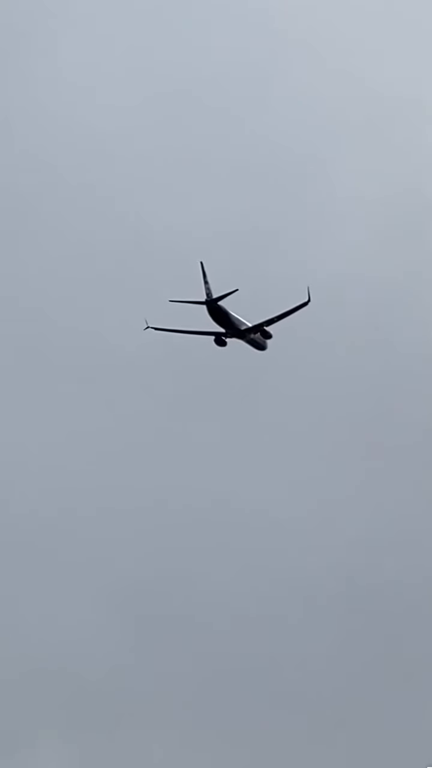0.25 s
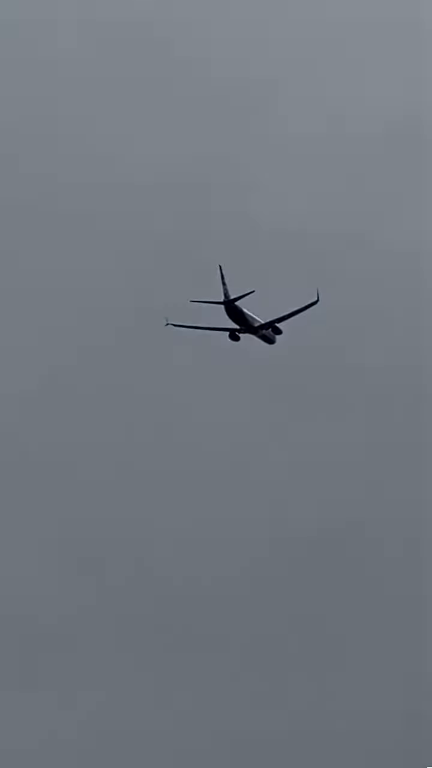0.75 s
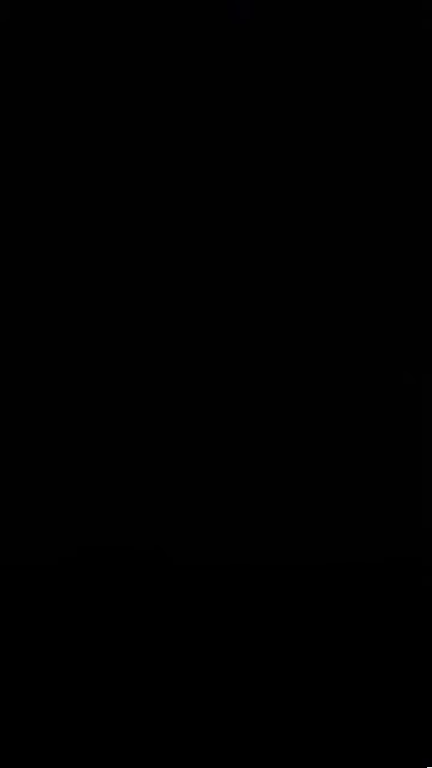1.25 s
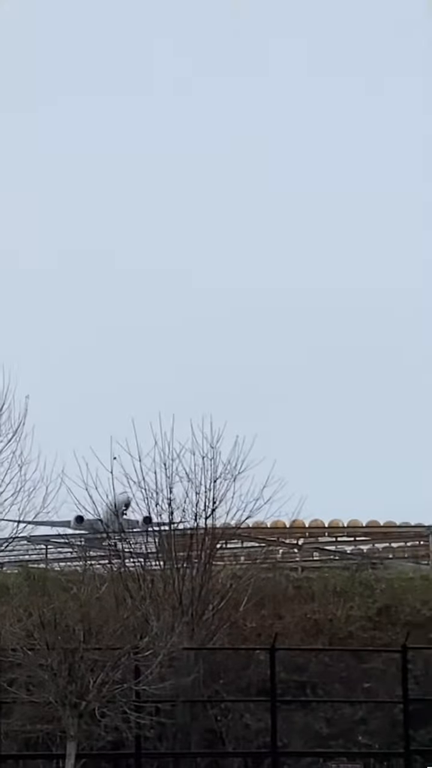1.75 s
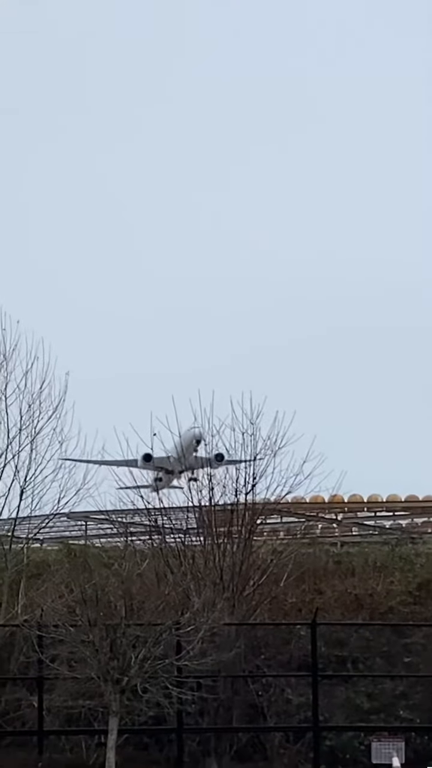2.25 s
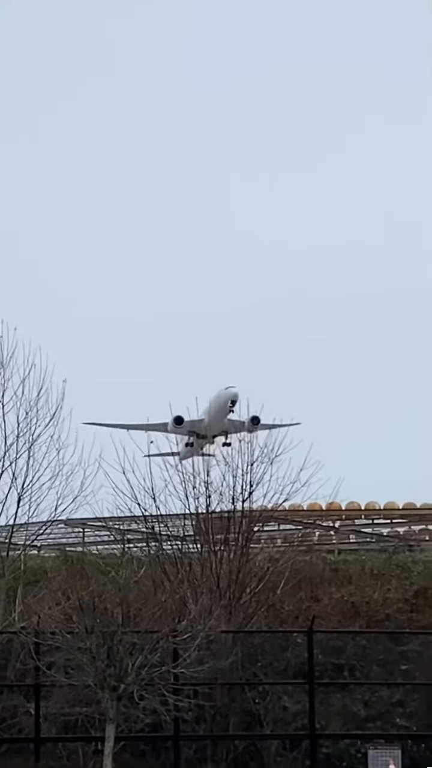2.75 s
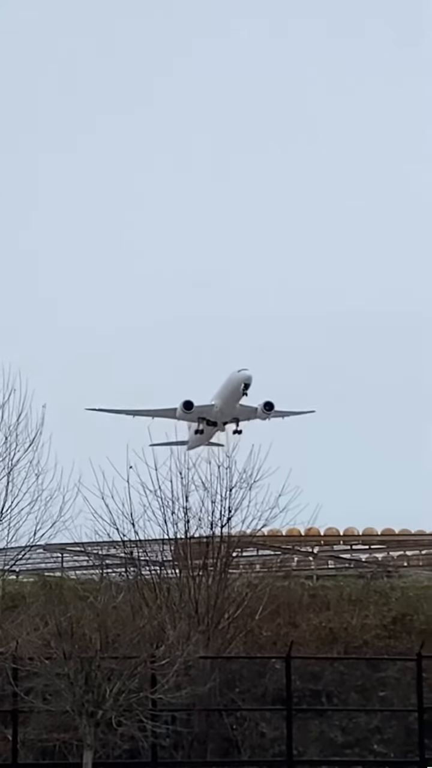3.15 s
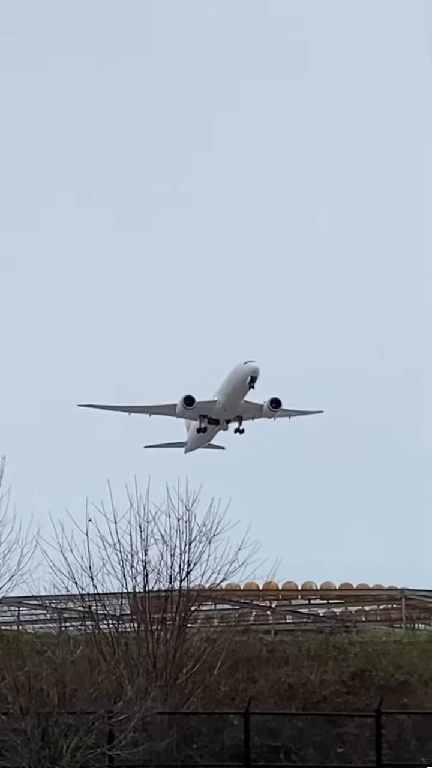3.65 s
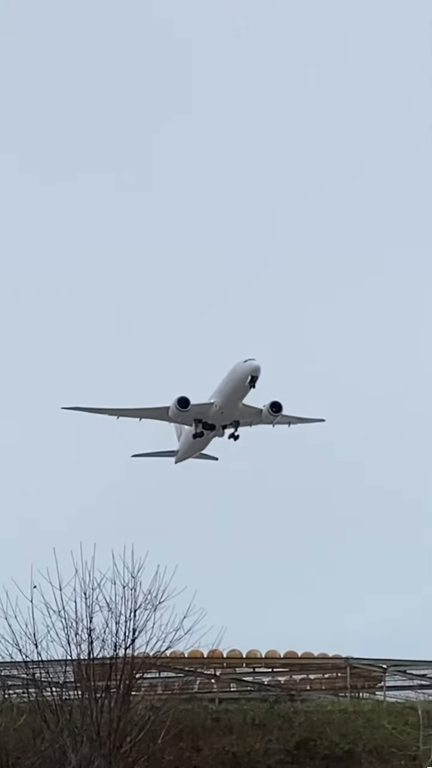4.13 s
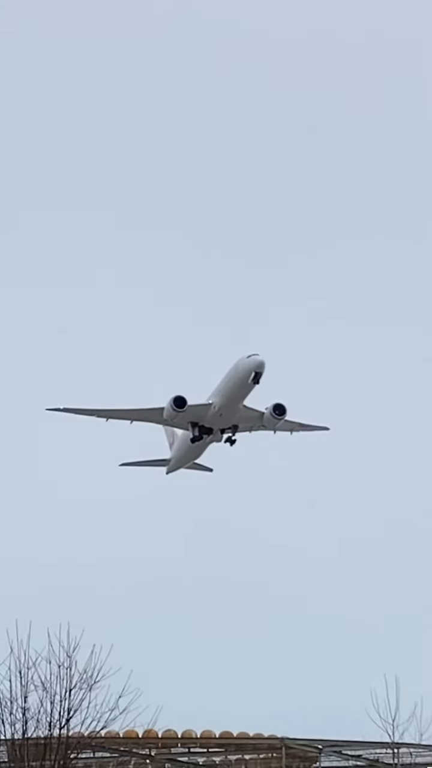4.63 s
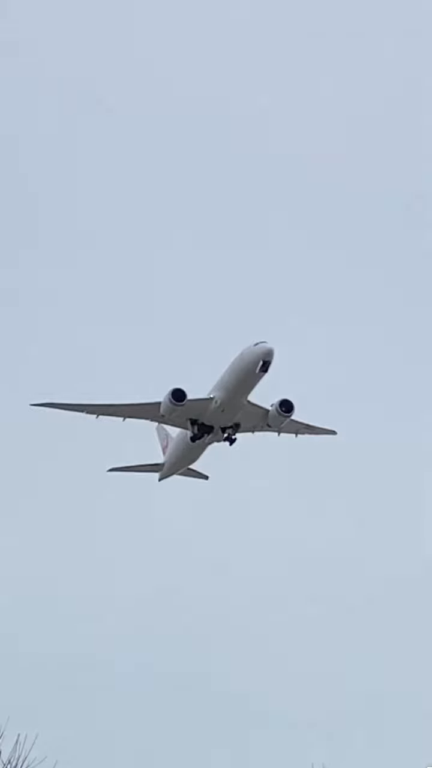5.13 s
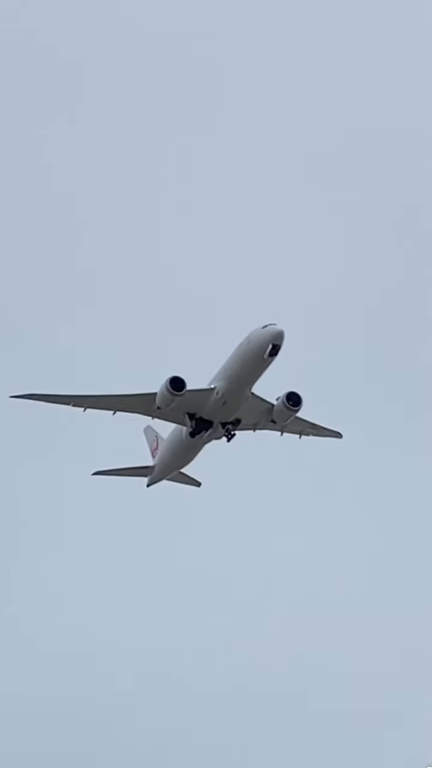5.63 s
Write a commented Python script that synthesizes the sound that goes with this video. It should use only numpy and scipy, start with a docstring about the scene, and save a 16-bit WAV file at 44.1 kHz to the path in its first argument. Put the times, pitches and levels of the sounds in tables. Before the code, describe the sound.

A receding jet's dark overhead roar cuts abruptly to a faint distant rumble that swells into a second airliner's bright, whining, tearing climb-out.

```python
"""Two twin-engined jet airliners climb out over an open spot by an airport, under a trace of very high hiss.
The first recedes overhead: dark exhaust roar, coloured noise combed by its ground echo.
At 1.226 s it gives way abruptly to the second, coming on from low behind a bank: noise registers go from
rumble to swelling fan rush, with clicks for crackle, gliding band noise for howl and sines for a wavering whine.
From 1 s small ticks and rustles (noise bursts) sound close by, and at 2.8 s a soft thump (a short cosine)."""
import sys
import numpy as np
from scipy import signal
from scipy.fft import rfft, irfft
from scipy.io import wavfile

SR = 44100
rng = np.random.default_rng(int(sys.argv[2]) if len(sys.argv) > 2 else 0)


def put_to_file(sound):
    """Save the sound as 16-bit audio at rate SR, in the file named by the first command-line argument."""
    columns = np.atleast_2d(sound).T  # one column per channel
    safe = np.clip(columns, -1, 1)
    whole_steps = np.round(safe * 32767)
    wavfile.write(sys.argv[1], SR, whole_steps.astype(np.int16))


N = 259308

TIME = np.arange(N) / SR   # s
HZ = np.maximum(np.arange(N // 2 + 1) * SR / N, 1)   # spectrum bins
SIDES = np.array([[1], [-1]])   # left, right
CHANGE_S = 1.226
CUTOFF_HZ = 15500
# approaching jet's treble: breaks through as it clears the bank, peaks as the inlets face the listener
# [t/s, swing/dB, followed in part by each register and the crackle]
TREBLE_SWING = [(1.26, -36.5), (1.7, -35), (2.47, -22), (2.9, -19.5), (3.15, -7.5), (3.4, -5), (3.55, 0.5),
                (3.72, 0.5), (4.2, 6), (4.6, -3), (5, 2), (5.55, -2.5), (5.88, -1.5)]


def from_db(db):
    """Decibels to gain."""
    return 10 ** (np.asarray(db) / 20)


def rms_one(x):
    """Scale to an rms of 1."""
    return x / np.sqrt(np.mean(x ** 2) + 1e-20)


def in_time(rows):
    """Each column of a time table, interpolated at every sample."""
    s, *columns = np.transpose(rows)
    return [np.interp(TIME, s, column) for column in columns]


def colour(points):
    """Gain at every bin from a [f/Hz, level/dB] table, interpolated over log frequency."""
    hz, db = np.transpose(points)
    return from_db(np.interp(np.log(HZ), np.log(hz), db))


def bump(at_s, spread_s):
    """Gaussian rise to 1 and fall, 1/e at spread_s from the centre."""
    return np.exp(-((TIME - at_s) / spread_s) ** 2)


def drift(corner_hz):
    """Slow random signal of spread 1: noise through a double one-pole low-pass."""
    step, settle = 40, 2000   # samples per slow sample; slow samples dropped
    pole = np.exp(-2 * np.pi * step * corner_hz / SR)
    noise = rng.standard_normal(N // step + settle + 2)
    slow = signal.lfilter([1], [1, -2 * pole, pole * pole], noise)[settle:]
    return np.interp(np.arange(N) / step, np.arange(len(slow)), rms_one(slow))


def stereo_noise(spectrum):
    """Coloured noise: a direct part common to both sides plus a scattered part of opposite sign."""
    # scattered part: widest early in the approach, narrowest near 4.4 s, then wider again
    # [t/s, level/dB added to width]
    diffuse = [(0, -8), (1.2, -7.5), (1.3, -4), (2.7, -4.5), (3.5, -7.5), (4.4, -18.5), (5.88, -9.5)]
    # spectrum of the scattered part [f/Hz, side minus mid/dB before the diffuse level]
    width = [(60, -37.5), (130, -37), (250, -23), (500, -9.5), (1000, -5), (2000, -9), (3500, -19),
             (6000, -10.5), (12000, -4)]
    low_cut = 1 / np.sqrt(1 + (18 / HZ) ** 4)
    mid, side = rfft(rng.standard_normal((2, N))) * colour(spectrum) * low_cut
    diffuse_db, = in_time(diffuse)
    direct = irfft(mid, N)
    scattered = from_db(diffuse_db) * irfft(side * colour(width), N)
    return direct + SIDES * scattered


def ground_echo(x, echo_rows, dull_hz):
    """A duller copy off the ground, whose changing lag sweeps a comb through the noise."""
    lag_ms, strength = in_time(echo_rows)
    bounced = irfft(rfft(x) / np.sqrt(1 + (HZ / dull_hz) ** 2), N)
    delayed = np.array([np.interp(TIME - lag_ms / 1000, TIME, side) for side in bounced])
    return x + strength * delayed


def through_air(x, splits_hz, levels_db, flutter_db, flutter_hz):
    """Each register follows its own level and flutters in the turbulent air."""
    rest, out = rfft(x), 0
    for split_hz, level_db, depth_db in zip([*splits_hz, SR], levels_db, flutter_db):
        below = 1 / (1 + (HZ / split_hz) ** 16)
        register = irfft(rest * below, N)
        rest = rest * (1 - below)
        gain = from_db(level_db + depth_db * drift(flutter_hz))
        out = out + rms_one(register) * gain
    return out


def receding_jet():
    """Exhaust mixing noise from high up, with a long ground echo; the rumble rolls by itself, the rasp swells most."""
    # engine noise heard from behind, balanced within each register only [f/Hz, level/dB per Hz]
    spectrum = [(22, -17), (35, -22), (55, 8), (100, 2.5), (220, -4), (420, -13.5), (620, -21.5),
                (1100, -28), (1600, -41), (2300, -45.5), (3500, -60), (5000, -78), (7000, -91),
                (15000, -101)]
    # ground echo [t/s, lag/ms, strength 0-1]
    echo = [(0, 4.8, .48), (.6, 4.74, .5), (.9, 4.66, .58), (1.08, 4.56, .74), (1.22, 4.53, .74)]
    # rumble [t/s, level/dB]
    rumble = [(0, -21), (.3, -21), (.45, -20), (.75, -20), (1.0, -19.5), (1.1, -19.5), (1.22, -22.5)]
    # upper roar sinks and swells again on its long way down [t/s, swell/dB, scaled per register]
    swell = [(0, 2.5), (.3, -1.5), (.7, -4), (.85, 0.5), (1.02, 1.5), (1.09, 7), (1.16, 4.5), (1.22, 2.5)]
    # exhaust roar, rush, rasp, hiss [level/dB at no swell, share of swell followed]
    registers = [(-21, 0.2), (-35, 0.3), (-47, 1), (-63.5, 0.6)]
    exhaust = ground_echo(stereo_noise(spectrum), echo, dull_hz=3200)
    rumble_db, = in_time(rumble)
    swell_db, = in_time(swell)
    levels_db = [rumble_db] + [db + share * swell_db for db, share in registers]
    return through_air(exhaust, [140, 540, 1400, 3000], levels_db,
                       flutter_db=[0.19, 0.18, 0.31, 0.38, 0.64], flutter_hz=11)


def thin_hiss(second):
    """A narrow noise band at a very high pitch, steady but for a drop as the second aircraft takes over."""
    centre_hz, half_width_hz = 11900, 330   # half gain at the half width
    first_db, second_db = -84.5, -96.5
    band = rfft(rng.standard_normal((2, N))) / (1 + ((HZ - centre_hz) / half_width_hz) ** 4)
    level = (1 - second) * from_db(first_db) + second * from_db(second_db)
    return level * rms_one(irfft(band, N))


def ticks(decay_s, width_octaves):
    """Each tick is a millisecond or so of noise through one broad resonance, with some of the bare snap."""
    # ticks close by [t/s, peak level/dB, ring f/Hz, bare snap/dB against the unscaled burst]
    tick_rows = [(0.9935, -27.5, 4370, -24), (1.199, -43, 4300, -19), (1.21, -58.5, 5370, -25.5),
                 (1.999, -59, 4630, -21), (2.035, -49.5, 12400, -11.5), (2.128, -57, 3910, -37),
                 (2.169, -63.5, 11500, -25), (2.277, -52, 3210, -36), (2.64, -56.5, 5280, -29.5),
                 (2.725, -64, 8930, -8), (3.168, -47.5, 5000, -33), (3.375, -48.5, 4300, -31.5)]
    out, size = np.zeros(N), 600
    for s, peak_db, ring_hz, snap_db in tick_rows:
        burst = rng.standard_normal(size) * np.exp(-np.arange(size) / SR / decay_s)
        edges_hz = ring_hz * 2 ** (np.array([-.5, .5]) * width_octaves)
        edges_hz = np.minimum(edges_hz, CUTOFF_HZ)
        resonance = signal.butter(2, edges_hz, "band", fs=SR, output="sos")
        tick = signal.sosfilt(resonance, burst) + from_db(snap_db) * burst
        at = round(s * SR)
        out[at:at + size] += from_db(peak_db) * tick / np.abs(tick).max()
    return out


def rustles(grain_db, grain_hz, sway_db, sway_hz):
    """Short spells of faint, grainy hiss that swell and die away unevenly."""
    # spells [loudest t/s, spread/s, level/dB]
    spells = [(1.207, .017, -71), (2.03, .06, -80.5), (2.62, 0.053, -73), (2.72, .055, -73)]
    # balance of the hiss [f/Hz, level/dB per Hz]
    spectrum = [(1500, -17.5), (3500, 6.5), (5500, -3), (7500, -7.5), (11000, -8), (15000, -17)]
    level = sum(from_db(db) * bump(s, spread_s) for s, spread_s, db in spells)
    uneven_db = grain_db * drift(grain_hz) + sway_db * drift(sway_hz)
    return level * rms_one(stereo_noise(spectrum) * from_db(uneven_db))


def approaching_jet():
    """Exhaust rumble and fan rush, with a short ground echo; rises out of the far roar and brightens as it nears."""
    # engine noise heard from ahead, balanced within each register only [f/Hz, level/dB per Hz]
    spectrum = [(22, -18.5), (35, -9.5), (55, 6.5), (150, 0), (300, -6), (520, -15.5), (800, -10.5),
                (1500, -20.5), (3000, -38), (4200, -46.5), (5200, -50.5), (7400, -62), (10500, -62),
                (15000, -71)]
    # ground echo [t/s, lag/ms, strength 0-1]
    echo = [(1.199, 1.1, 0.21), (2.4, 0.94, 0.026), (3.1, 0.87, 0.13), (3.901, .97, 0.17), (5, 0.8, 0.11),
            (5.601, 1.13, 0.14), (5.88, 1.2, 0.43)]
    # roar as the jet closes in [t/s, swing/dB against close, scaled per register]
    approach = [(1.26, -29), (1.75, -27), (2.2, -20.5), (2.65, -19), (3.2, -13.5), (3.6, -11), (4.2, -7),
                (4.45, -8), (4.68, -2.5), (4.88, -3.5), (5.03, -3), (5.4, -1), (5.55, -1.5), (5.8, 0)]
    # rumble, roar, upper roar, fan rush, upper rush, rasp, sizzle, hiss [close level/dB,
    # share of approach, share of treble, surge/dB, far airfield roar/dB]
    registers = [(-21.5, 0.68, 0.035, 0.5, -30), (-21, 0.95, -0.1, 2.5, -39.5),
                 (-28, 0.81, 0.011, 4.5, -66), (-24.5, 1.104, 0.063, 2, -52.5),
                 (-32, 1.15, 0.27, 1.5, -58.5), (-45.5, 0.48, 0.53, 9.5, -72.5),
                 (-57, 0.066, 0.83, 3.5, -86.5), (-61, 0.099, 1, -4, -95.5)]
    # brief heaves and lulls [t/s, rumble change/dB, roar change/dB, fan and upper rush change/dB]
    heaves = [(1.92, -2.5, 6, 0), (2.9, -2, 1, 1.5), (3.6, 2, 3.5, 0.5), (3.91, 5, 1.5, 3),
              (4.24, -0.5, 2, -1), (4.66, 2, 0, -0.5), (4.75, 2.5, 2, 0.5), (5.0, 1, -2, 2.5),
              (5.06, 2, -1, 2), (5.17, -2, 3.5, 0), (5.24, 3.5, 5, 0), (5.32, 3.5, 2, 2.5),
              (5.48, 3, 2.5, -0.5), (5.59, 5.5, 3.5, -1), (5.69, 0, 2, 0), (5.875, 0, -0.5, 2)]
    engines = ground_echo(stereo_noise(spectrum), echo, dull_hz=3960)
    approach_db, = in_time(approach)
    treble_db, = in_time(TREBLE_SWING)
    surge = bump(5.77, 0.12)   # roar turns bright and tearing as the engines come overhead
    levels_db = []
    for close_db, near, bright, surge_db, far_db in registers:
        jet_db = close_db + near * approach_db + bright * treble_db + surge_db * surge
        power_sum = np.hypot(from_db(jet_db), from_db(far_db))
        levels_db.append(20 * np.log10(power_sum))
    for s, rumble_db, roar_db, rush_db in heaves:
        heave = bump(s, 0.037)
        levels_db[0] += rumble_db * heave
        levels_db[1] += roar_db * heave
        levels_db[3] += rush_db * heave
        levels_db[4] += rush_db * heave
    gust_db = 0.5 * drift(6)   # turbulence shakes fan rush and above together
    levels_db[3:] = [db + gust_db for db in levels_db[3:]]
    return through_air(engines, [140, 330, 600, 1250, 2100, 3000, 4200], levels_db,
                       flutter_db=[0.53, 0.8, 0.32, 0.51, 1.0, 0.94, 0.93, 0.96], flutter_hz=36)


def crackle(per_s, size_spread_db):
    """Small shocks in the exhaust: random clicks of uneven size that come through with the treble."""
    # balance of the clicks [f/Hz, level/dB]
    spectrum = [(500, -14), (1800, 6), (3000, 4), (5200, -11), (7400, -18.5), (11000, -23.5),
                (15000, -34.5)]
    level_db, treble_share = -53, 0.96   # level at no treble swing
    sizes = from_db(size_spread_db * np.minimum(rng.exponential(1, N), 3.5))
    shocks = sizes * (rng.random(N) < per_s / SR)
    treble_db, = in_time(TREBLE_SWING)
    snaps = irfft(rfft(shocks - shocks.mean()) * colour(spectrum), N)
    return from_db(level_db + treble_share * treble_db) * rms_one(snaps)


def inlet_howl(half_width_hz):
    """Breathy howl: a narrow band of fan noise whose centre glides as the inlets turn past."""
    # howl [t/s, centre f/Hz, level/dB]
    glide = [(1.26, 1064, -54.5), (2.65, 1060, -58), (2.85, 1030, -48), (3.1, 1057, -43), (3.9, 1100, -37),
             (4.3, 1096, -37.5), (4.6, 1010, -47), (4.88, 1100, -34.5), (5.05, 1118, -29),
             (5.18, 1003, -34.5), (5.31, 1024, -29), (5.6, 812, -55), (5.88, 789, -24)]
    centre_hz, level_db = in_time(glide)
    low_pass = 1 / (1 + (HZ / half_width_hz) ** 4)
    a, b = irfft(rfft(rng.standard_normal((2, N))) * low_pass, N)
    phase = 2 * np.pi * np.cumsum(centre_hz) / SR
    return from_db(level_db) * rms_one(a * np.cos(phase) + b * np.sin(phase))


def fan_whine(waver, flutter_db):
    """The blade-passing tone and its fellow lines; turbulence shakes their pitch and level."""
    # blade-passing tone sinks as the closing speed falls off [t/s, f/Hz before waver]
    blade_rate = [(1.26, 896), (2.6, 894), (3.6, 890), (4.2, 884), (4.7, 880), (5.1, 877), (5.6, 873),
                  (5.88, 871)]
    # tone fades in and out on its way through the air [t/s, level/dB before trim and flutter]
    tone_level = [(1.26, -60), (3.8, -47), (4.15, -42), (4.38, -49), (4.456, -35), (4.54, -44),
                  (4.65, -27.5), (4.74, -33), (4.85, -41), (4.96, -32), (5.07, -19.5), (5.17, -39),
                  (5.23, -28), (5.33, -30.5), (5.41, -40), (5.54, -22.5), (5.63, -27), (5.73, -25),
                  (5.88, -34)]
    # overtones and buzz-saw lines, each beamed past in turn
    # [multiple of blade rate, level/dB before flutter, loudest t/s, spread/s]
    fan_lines = [(2, -49, 5.1, 0.8), (2.99, -54, 5.8, 1), (.502, -37, 4.75, 0.27), (.79, -34.5, 5.75, 0.18),
                 (1.663, -44, 4.9, 1)]
    blade_hz, = in_time(blade_rate)
    level_db, = in_time(tone_level)
    trim_db = -2.0
    phase = 2 * np.pi * np.cumsum(blade_hz * (1 + waver * drift(15.26))) / SR
    out = np.sin(phase) * from_db(level_db + trim_db + flutter_db * drift(12))
    for multiple, line_db, loudest_s, spread_s in fan_lines:
        beam = bump(loudest_s, spread_s)
        out += np.sin(multiple * phase) * beam * from_db(line_db + flutter_db * drift(6.1))
    return np.sqrt(2) * out   # levels are rms


def thump():
    """A dull bump of air, only a couple of swings long."""
    at_s, peak_db, pitch_hz, spread_s = 2.824, -11.5, 64.4, 0.015
    swing = np.cos(2 * np.pi * pitch_hz * (TIME - at_s))
    return from_db(peak_db) * bump(at_s, spread_s) * swing


def scene():
    """One aircraft gives way to the other within a few milliseconds; the close sounds run across both."""
    second = np.clip((TIME - CHANGE_S) / 0.0036 + .5, 0, 1)
    oncoming = approaching_jet() + crackle(per_s=450, size_spread_db=4.0)
    oncoming = oncoming + inlet_howl(half_width_hz=110) + fan_whine(waver=0.00492, flutter_db=4)
    nearby = ticks(decay_s=0.00054, width_octaves=0.6) + thump()
    nearby = nearby + rustles(grain_db=3.5, grain_hz=120, sway_db=-0.5, sway_hz=20)
    return (1 - second) * receding_jet() + second * oncoming + nearby + thin_hiss(second)


def record(dry):
    """Soft ends; left and right differ in phase and level; the top is cut steeply."""
    # phase between left and right, which rises and winds round in the treble [f/Hz, left lead/rad]
    side_phase = [(150, 0), (450, -.25), (800, -.08), (1500, 0), (2000, .03), (2500, .55), (3200, .04),
                  (4000, .03), (4400, .8), (5000, .1), (6000, 1.7), (7300, 3.1), (9700, 6.25), (11200, 6.4),
                  (12100, 7.3), (13000, 9.3), (14400, 9.6), (15200, 12.4)]
    # balance of left and right [f/Hz, left minus right/dB]
    side_balance = [(180, 0), (400, 1.3), (600, -.5), (1100, -.4), (2000, .1)]
    to_end_s = np.minimum(TIME, TIME[-1] - TIME)
    ends = np.sin(np.pi / 2 * np.clip(to_end_s / .003, 0, 1)) ** 2
    phase = np.interp(HZ, *np.transpose(side_phase))
    # half the difference to each side
    side_gains = (colour(side_balance) * np.exp(1j * phase)) ** (SIDES / 2)
    heard = irfft(rfft(dry * ends) * side_gains, N)
    top_cut = signal.cheby2(12, 70, CUTOFF_HZ * 1.08, fs=SR, output="sos")
    return signal.sosfilt(top_cut, heard)


dry = scene()
out = record(dry)
put_to_file(out)
```